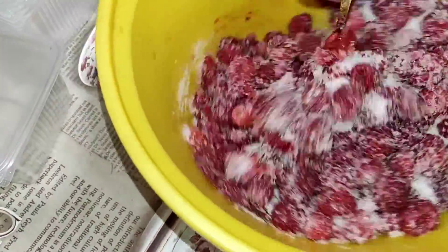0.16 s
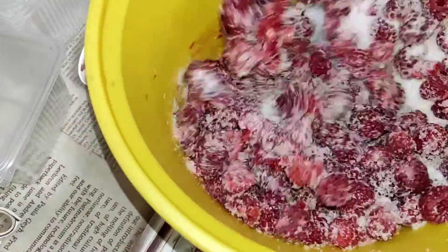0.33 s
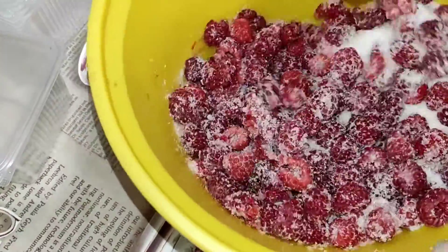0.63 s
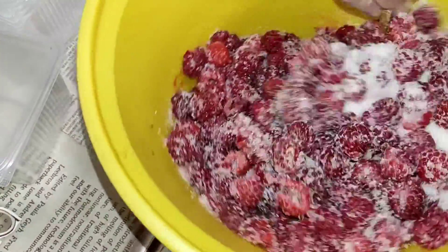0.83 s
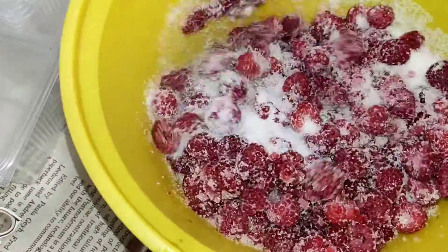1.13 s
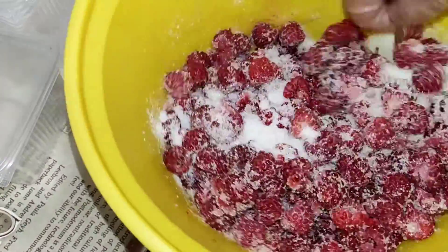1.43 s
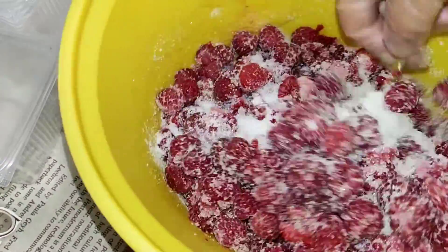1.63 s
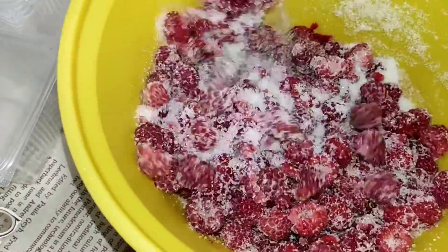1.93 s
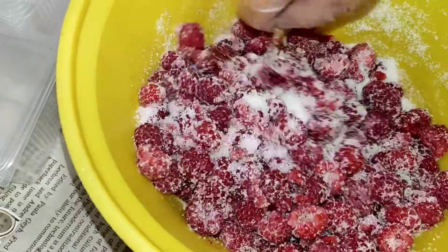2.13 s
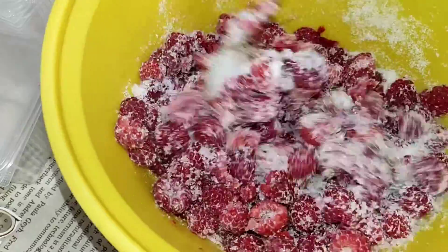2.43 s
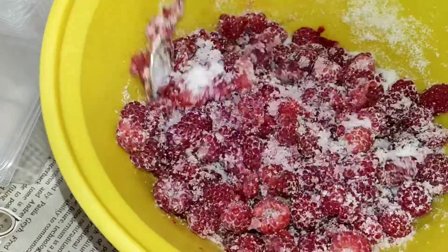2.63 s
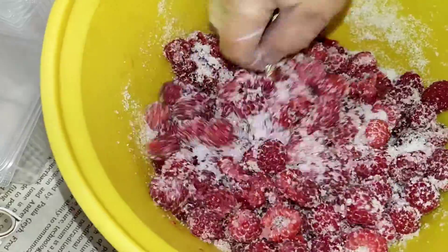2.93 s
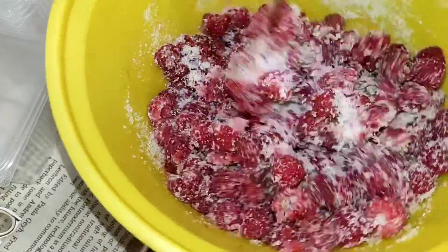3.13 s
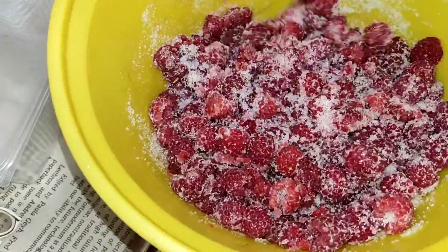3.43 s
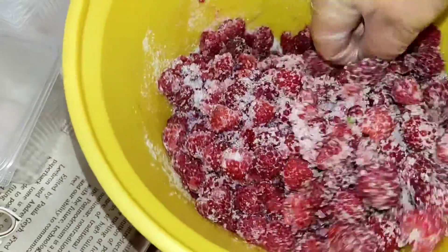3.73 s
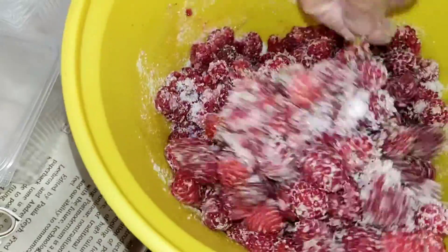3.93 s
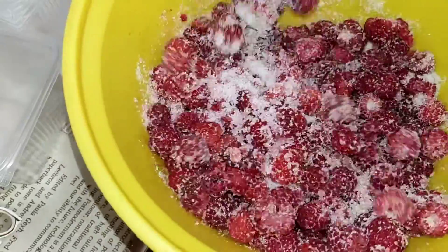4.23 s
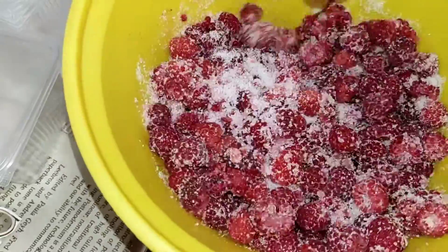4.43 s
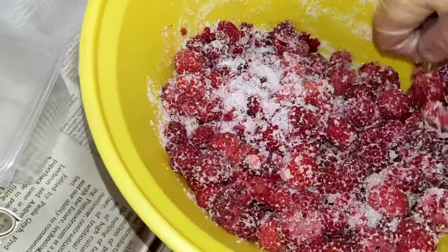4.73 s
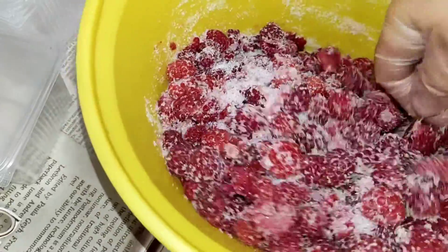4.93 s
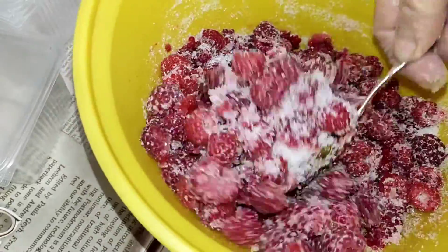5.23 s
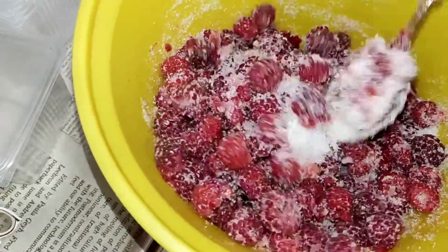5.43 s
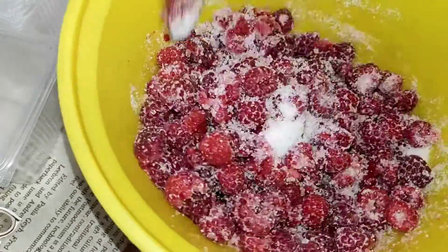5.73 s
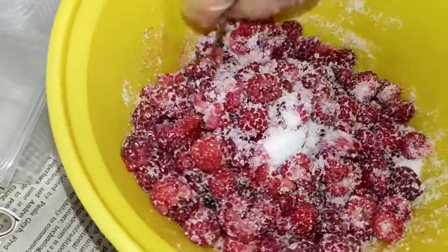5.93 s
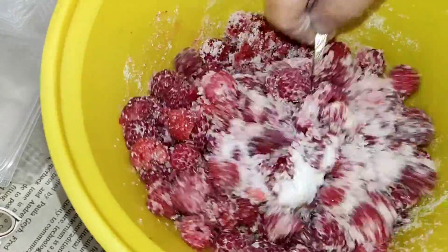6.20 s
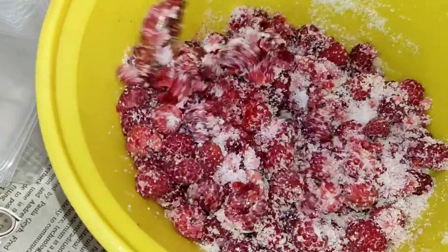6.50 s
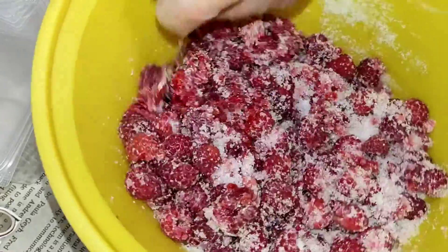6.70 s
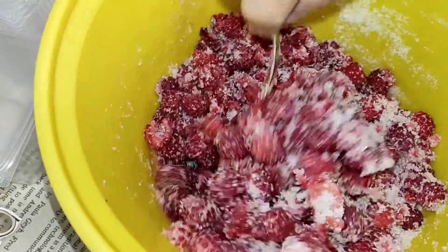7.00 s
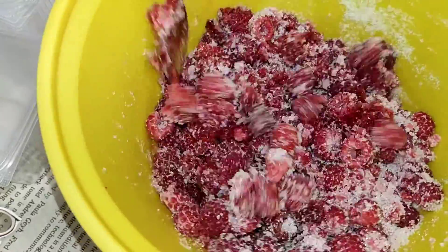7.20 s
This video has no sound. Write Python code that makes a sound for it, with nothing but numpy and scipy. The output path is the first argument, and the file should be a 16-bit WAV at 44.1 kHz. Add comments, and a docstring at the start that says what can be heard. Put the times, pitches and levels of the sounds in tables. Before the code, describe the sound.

Close stereo pickup of sugared raspberries being turned with a spoon. Each stroke gives a low, short plastic knock, a dry crackle of crushed sugar and sometimes a dull metal tick. Afterwards crystals trickle with a thin hiss and fruit tumbles damply on the wall. Strokes are irregular, with quiet gaps of rustling, slight room echo and low steady room tone.

```python
"""A spoon grates and bumps in a plastic bowl as sugar starts to trickle: raspberries are being folded in a kitchen.
Shaped noise grinds the spoon over sugar and cracks crystals; fading tones ring the bowl and the metal spoon.
Between strokes berries tumble back, built from tiny random hits, and sugar hisses and rustles after them.
Random noise with a dying tail gives the small room's echo, over a quiet, steady room tone."""
import sys
import numpy as np
from scipy import signal
from scipy.fft import rfft, irfft
from scipy.io import wavfile
from scipy.ndimage import uniform_filter1d, map_coordinates

SR = 44100
rng = np.random.default_rng(int(sys.argv[2]) if len(sys.argv) > 2 else 0)


def inscribe(sig):
    """Save sig as 16-bit PCM at rate SR to the path in sys.argv[1].

    A 1-D sig is mono; a 2-D sig holds one channel per row.
    Samples are clipped to [-1, 1] before scaling.
    """
    pcm = np.round(np.clip(np.atleast_2d(sig).T, -1, 1) * 32767)
    wavfile.write(sys.argv[1], SR, pcm.astype(np.int16))


N = 324425
TIME = np.arange(N) / SR
LEFT_RIGHT = np.array([[1], [-1]])

# Levels in the tables are relative: the functions that use them may add an overall level.
# Spoon dragged over sugar on the wall: start t/s, end t/s, start level/dB, end level/dB
SPOON_DRAGS = [(0.0, 0.05, -23.5, -53), (0.531, 0.549, -29, -22), (0.544, 0.597, -46, -54),
               (0.632, 0.713, -36.5, -24.5), (1.262, 1.301, -44, -38), (1.302, 1.366, -26.5, -26.5),
               (1.444, 1.49, -29, -30), (3.355, 3.386, -46, -42), (4.362, 4.374, -42, -24.5),
               (4.374, 4.423, -47, -41.5), (4.506, 4.535, -39, -30), (4.533, 4.573, -28, -36),
               (4.633, 4.697, -27.5, -21), (4.7, 4.744, -28, -39), (5.813, 5.837, -52, -34),
               (5.836, 5.842, -31, -27), (5.839, 5.862, -35, -30), (5.855, 5.876, -29.5, -14.5),
               (5.882, 5.932, -28, -30), (5.933, 5.973, -33, -24.5), (5.976, 6, -23, -25),
               (5.998, 6.012, -31, -29), (6.854, 6.894, -53, -24), (7.328, 7.367, -28, -37)]
# Where the dragged spoon sings: f/Hz, time to fall 60 dB t/s
SINGING_MODES = [(1770, 0.017), (2200, 0.039)]
# Parts of the heap sliding: start t/s, end t/s, fine sugar level/dB, fruit and coarse sugar level/dB
HEAP_SLIDES = [(0.0, -0.006, -33, -41.5), (0.198, 0.343, -43, -52.5), (0.432, 0.475, -46, -54),
               (0.64, 0.87, -39, -43), (1.003, 1.07, -43.5, -48.5), (1.304, 1.665, -34.5, -42),
               (1.666, 1.709, -36, -42), (1.86, 1.898, -46.5, -51.5), (1.986, 2.116, -42, -49.5),
               (2.205, 2.235, -46, -49.5), (2.484, 2.522, -43.5, -55), (2.744, 2.76, -37, -43.5),
               (2.89, 2.968, -45, -49), (3.155, 3.285, -48, -54.5), (3.43, 3.46, -43, -49.5),
               (3.55, 3.78, -44.5, -48), (3.817, 3.922, -39.5, -44), (4.047, 4.306, -47, -54.5),
               (4.413, 4.64, -45, -54.5), (4.622, 5.023, -36.5, -42), (5.026, 5.09, -38, -41.5),
               (5.186, 5.274, -44.5, -50.5), (5.324, 5.398, -46.5, -54), (5.544, 5.543, -59, -55.5),
               (5.673, 5.705, -46.5, -54.5), (5.91, 6.175, -45.5, -47.5), (6.24, 6.29, -49, -54),
               (6.397, 6.484, -46, -55.5), (6.55, 6.615, -49.5, -60), (6.717, 6.753, -37, -45.5),
               (6.853, 6.98, -42, -46), (7.09, 7.18, -50, -55), (7.192, 7.227, -50.5, -56)]
# Spoon and load bumping the bowl: t/s, deep ring level/dB, ring centre f/Hz,
# wall clack level/dB, clack centre f/Hz, clack width (share of its centre)
BOWL_KNOCKS = [(0.001, -11.5, 290, -8.5, 640, 0.45), (0.509, -36, 230, -46, 950, 0.33),
               (0.7168, -14.5, 248, -10, 750, 0.35), (0.752, -27, 229, -41, 800, .5),
               (0.805, -33.5, 240, -29, 790, .3), (1.257, -24.5, 158, -30, 1500, 0.18),
               (1.4879, -16, 330, -15, 700, 0.62), (1.599, -34, 326, -43, 480, 0.4),
               (2.2205, -23, 1700, -14.5, 1830, 0.22), (2.221, -22, 530, -15.5, 640, 0.41),
               (2.2265, -28.5, 360, -22, 620, .5), (2.258, -37, 400, -24, 800, .45),
               (3.572, -23, 236, -14, 1070, 0.16), (3.574, -19.5, 318, -23, 1650, 0.14),
               (3.6, -30, 256, -28, 940, 0.26), (3.615, -34, 256, -23, 900, 0.22),
               (3.632, -44, 300, -28, 960, 0.19), (3.638, -33, 500, -22.5, 920, 0.12),
               (3.689, -34.5, 650, -28.5, 675, .15), (3.733, -40, 243, -31, 800, .25),
               (4.227, -31.5, 164, -41, 730, 0.39), (4.372, -33, 201, -37, 794, 0.4),
               (4.545, -17.5, 345, -18.5, 1180, 0.15), (4.646, -52, 300, -20.5, 1350, 0.13),
               (4.686, -38, 300, -18.5, 865, 0.13), (4.786, -33.5, 318, -23.5, 585, 0.35),
               (4.906, -35.5, 300, -33, 803, 0.66), (4.989, -39, 267, -30, 700, 0.49),
               (5.529, -68, 297, -36.5, 1979, 0.55), (5.887, -37, 200, -21, 1540, 0.35),
               (5.94, -37, 300, -21.5, 1400, 0.27), (6.0135, -26, 251, -21.5, 460, 0.15),
               (6.161, -37.5, 560, -26, 557, 0.23), (6.176, -38, 553, -20.5, 1160, 0.25),
               (6.1827, -33, 550, -24, 1240, 0.21), (6.884, -30.5, 860, -20, 1420, 0.32),
               (7.329, -29.5, 260, -22.5, 1510, 0.38)]
# Ringing of the loaded plastic bowl: f/Hz, level/dB, time to fall 60 dB t/s
BOWL_MODES = [(122, 0, 0.21), (154, -6, 0.083), (202.5, -5, 0.39), (227.5, -1, 0.22), (300, 1, 0.086),
              (345, -3, 0.073), (416, -2.5, 0.14), (519, 1.5, 0.1), (612, -5, 0.1), (743, 1.5, 0.098),
              (960, 1.5, 0.11), (1090, 3.5, 0.082), (1735, 0, 0.072)]
# Berry clumps tumbling on the wall: start t/s, end t/s, level/dB, wall centre f/Hz, width (share of centre)
BERRY_TUMBLES = [(0.05, 0.113, -36.5, 890, 0.95), (0.723, 0.793, -45, 680, 0.43), (0.21, 0.3, -46, 536, 1),
                 (1.35, 1.46, -42.5, 594, 0.53), (1.5, 1.616, -42.5, 540, 0.52),
                 (2.211, 2.223, -35.5, 810, .3), (2.258, 2.25, -42, 930, .55),
                 (2.356, 2.393, -47.5, 766, 0.32), (2.91, 2.987, -49.5, 496, 1),
                 (3.593, 3.66, -35.5, 920, 0.37), (3.673, 3.698, -38.5, 714, 0.27),
                 (3.705, 3.754, -40, 834, 0.56), (4.545, 4.772, -42.5, 680, 0.62),
                 (5.048, 5.14, -40, 2000, 0.28), (5.883, 5.967, -36.5, 1410, 0.52),
                 (6.093, 6.173, -41, 840, 0.86), (6.163, 6.18, -33, 610, 0.24)]
# Larger crystals cracking: t/s, level/dB, left over right level/dB, extra low level/dB, extra top level/dB
CRYSTAL_CRACKS = [(0.5115, -11.5, -1.5, 0, -2), (0.5342, -27, -3, -5, 2), (0.5372, -12, -5, -1, -3),
                  (0.5424, -26, -10, 6, -4), (0.5964, -31, -5.0, 17, -4.0), (0.7016, -20.5, -8, 18, -5),
                  (0.706, -19, -11, 0.5, -8), (0.7171, -19, 11, 16, -2), (1.2564, -9.0, -4, 3, 0),
                  (1.311, -11, -8.5, 0.5, -4), (1.3875, -24, 0, 5, -6), (1.4126, -23, -4, 2, -3.0),
                  (1.4876, -11.5, -2, 4, 7), (2.0365, -29, -13, -16, -6), (2.2251, -23.5, 2, 6, 0),
                  (3.5731, -17, 2, 2, -1), (3.5998, -18.5, -3, 5, 0.5), (3.6316, -26.5, -5, 1, -1.0),
                  (4.3732, -15.5, -4, 2.5, -5), (4.3771, -12, -1, 2.5, -2), (4.53, -22.5, -1.0, 6, -2.0),
                  (4.5441, -13, 2, 6, 8), (4.6359, -18, 4, 13, 9), (4.6475, -19.5, -2, 13, 6),
                  (4.6705, -17, 3, -5, 8), (4.678, -19, -4.0, -2, -2.0), (4.6826, -16, 3, 7, 5),
                  (4.6868, -17, -4, -8, 3), (5.8385, -21.0, -4, -11, -1.0), (5.8535, -18, -3, -3, -2),
                  (5.8574, -11.5, -3.0, -10, -5), (5.862, -15.5, 0, -6, -9.0), (5.8726, -19, 0, -1, -2),
                  (5.8869, -13.5, 12, 3, 4), (5.8927, -20, -6, 0, -1), (5.9135, -23, 3, 1, 0),
                  (5.9205, -21.5, -2, -3, 2), (5.9285, -31, 6, 0, 4), (5.9395, -20, -2.0, -5, -6),
                  (5.953, -24, 5, 4, 3.0), (5.9699, -18, 13, 4.5, 6), (5.9768, -17, 7, -11, 10),
                  (6.0068, -26, 2, -5, 2), (6.1846, -29.5, -3, 9, -3), (6.8645, -27, -2, 4, -2),
                  (6.8815, -18, -5, 1, -4), (6.8848, -15, -1, 14.5, -5), (6.8924, -16.5, -1, 7, -12.0),
                  (7.3282, -10.5, -3, -9, -15), (7.3382, -18, -5, -9, -8)]
# Bare spoon meeting the wall: t/s, level/dB
SPOON_CLINKS = [(0.5115, -19), (1.257, -18.5), (4.376, -23), (5.887, -25), (6.886, -47), (7.329, -30)]
# Ringing of the spoon, damped by fruit and hand: f/Hz, level/dB, time to fall 60 dB t/s
SPOON_MODES = [(2200, 2.5, 0.024), (2550, -2, 0.014), (4600, -15, 0.01), (5270, -16, 0.02)]
# Thin ring of the spoon as it is lifted clear: t/s, f/Hz, level/dB, time to fall 60 dB t/s
LIFTED_SPOON = (6.886, 1770, -49, 0.45)
# Colour of the spoon's grinding: f/Hz, level/dB per Hz
GRIT_COLOUR = [(100, -19), (300, -12), (1000, -12.5), (2200, -7), (3300, -8.5), (5000, -6), (7000, -2.5),
               (8800, 1.5), (11000, 0), (13000, -10.5), (15000, -8)]
# Colour of fine sliding sugar: f/Hz, level/dB per Hz
HISS_COLOUR = [(2500, -32.5), (5000, -18), (7000, -10.5), (8000, -5.5), (8900, -1.5), (10000, -3),
               (11500, -8.5), (13000, -14), (14500, -20)]
# Colour of coarse sliding sugar: f/Hz, level/dB per Hz
RUSTLE_COLOUR = [(400, -19.5), (1000, -3), (1600, 0), (2150, 3.5), (3000, -1), (4500, -2.5), (6500, -6),
                 (10000, -9)]
# Colour of fruit rolling on fruit: f/Hz, level/dB per Hz
BERRY_COLOUR = [(90, -54), (160, -1), (220, 13.5), (270, -1), (520, 9), (900, 3.5), (1400, -11),
                (2500, -7.5), (6000, -28)]
# Colour of cracking crystals: f/Hz, level/dB per Hz
CRUSH_COLOUR = [(150, -28), (500, -13.5), (1000, -16), (2200, -13), (3400, -9.5), (5000, -6.5),
                (7000, -3.5), (8800, 5.5), (11000, 2.5), (13000, -5.5), (15000, -4)]
# Colour of the quiet room: f/Hz, level/dB per Hz
ROOM_COLOUR = [(20, 9.5), (50, -1), (80, -3.5), (130, -6.5), (220, -9), (400, -16), (1000, -27.5),
               (3000, -52), (14000, -14.5)]
# Likeness of left and right: f/Hz, likeness (no unit; limited when used)
STEREO_LIKENESS = [(30, 0.5), (70, -0.5), (130, 1.2), (300, 0.56), (650, 0.8), (1200, 0.03), (3000, -0.08),
                   (6000, 0), (7500, 0.85), (10000, 1.4), (14000, 0.8)]
# Balance of the two sides: f/Hz, left over right level/dB
STEREO_BALANCE = [(100, -1.5), (210, 1), (350, 3), (900, -0.5), (2500, 2), (4200, 0), (7000, -1.5),
                  (9500, -4.5), (11500, 9.5), (14000, 0.5)]

SLIDE_RISE_DB_PER_S, SLIDE_FALL_DB_PER_S = 140, 96.5   # gathers quickly, runs out more slowly
CREEP_SUGAR_DB, CREEP_FRUIT_DB = -52.5, -60   # the heap never quite rests
ROLL_DB, ROLL_FOLLOWS = -61, 0.52   # fruit's mean level; share of the slide's swing it follows
TICKS_PER_S = 110   # at the strongest slide
TUMBLE_RISE_DB_PER_S, TUMBLE_FALL_DB_PER_S = 900, 450
KITCHEN_T60_S, KITCHEN_DB, KITCHEN_TREBLE_DB = 0.36, -8.5, -3
ROOM_TONE_DB = -53
CUTOFF_HZ = 14200


def from_db(db):
    """Turn decibels into a multiplier."""
    return 10 ** (np.asarray(db) / 20)


def rms_one(x):
    """Scale to an average power of 1."""
    return x / np.sqrt(np.mean(x ** 2) + 1e-20)


def at_hz(points, hz):
    """Read a table between its points, with pitch spaced as the ear hears it (log frequency)."""
    known_hz, values = np.transpose(points)
    return np.interp(np.log(hz + 1), np.log(known_hz), values)


def causal(gain, size):
    """Make a filter with the given gain per frequency that acts as early as it can (minimum phase)."""
    cepstrum = irfft(np.log(gain + 1e-9))
    cepstrum[1:size // 2] *= 2
    cepstrum[size // 2 + 1:] = 0
    return irfft(np.exp(rfft(cepstrum)))


def radiate(pair, spectrum, likeness_share=1, size=4096):
    """Colour two unrelated noises and blend them into left and right, as alike as the tables ask."""
    hz = np.linspace(0, SR / 2, size // 2 + 1)
    gain = rms_one(from_db(at_hz(spectrum, hz)))
    alike = np.clip(likeness_share * at_hz(STEREO_LIKENESS, hz), -.98, .98)
    side_gain = gain * np.sqrt((1 - alike) / (1 + alike))
    mid = signal.oaconvolve(pair[0], causal(gain, size))[:N]
    side = signal.oaconvolve(pair[1], causal(side_gain, size))[:N]
    lean_db = at_hz(STEREO_BALANCE, hz) / 2
    channels = []
    for sign in (1, -1):
        balance = causal(from_db(sign * lean_db), size)
        channels.append(signal.oaconvolve(mid + sign * side, balance)[:N])
    return np.array(channels)


def drift(rate):
    """Wander smoothly between random values, drawn `rate` times a second with spread 1."""
    knots = rng.standard_normal(N // 8)
    return np.interp(TIME * rate, np.arange(len(knots)), knots)


def grains(per_s, spread_db):
    """Scatter tiny hits of uneven size at random times, as two channels of average power 1."""
    sizes = from_db(spread_db * np.minimum(rng.exponential(1, N), 4))
    hits = rng.random(N) < per_s / SR
    return rms_one(hits * sizes * rng.standard_normal((2, N)))


def patchy(pair, depth_db, width_hz, hold_s, size=512):
    """Let the colour wander: each band of pitch swells and sinks by itself."""
    hz, s, spectra = signal.stft(pair, SR, nperseg=size)
    knots = rng.standard_normal((140, 320))
    places = np.meshgrid(hz / width_hz, s / hold_s, indexing="ij")
    gain = from_db(depth_db * map_coordinates(knots, places, order=1, mode="wrap"))
    return signal.istft(spectra * rms_one(gain), SR, nperseg=size)[1][:, :N]


def clicks(times, sizes):
    """Put a one-sample click at each time."""
    return np.bincount(np.clip(np.round(times * SR).astype(int), 0, N - 1), sizes, N)


def ring(force, hz, t60):
    """Ring a fading sine with a force; a click of size 1 starts it at about height 1."""
    shrink, step = np.exp(-np.log(1000) / (t60 * SR)), 2 * np.pi * hz / SR
    feedback = [1, -2 * shrink * np.cos(step), shrink * shrink]
    return signal.lfilter([0, np.sin(step)], feedback, force + 1e-18)


def burst(noise, envelope):
    """Shape noise by an envelope; each channel gets exactly the envelope's energy."""
    shaped = noise[:, :len(envelope)] * envelope
    return shaped * np.sqrt(np.sum(envelope ** 2) / np.sum(shaped ** 2, axis=1, keepdims=True))


def swell(start, end, rise_db_per_s, fall_db_per_s):
    """Rise from start and fall towards end, both in dB below a ceiling of 0."""
    rise, fall = rise_db_per_s * (TIME - start), fall_db_per_s * (end - TIME)
    # Before start and after end the slopes carry on below the ceiling.
    return np.clip(np.minimum(rise, fall), -120, 0)


def band_around(hz, width):
    """Make a filter that passes pitches near a centre."""
    return signal.butter(2, [hz / (1 + width), hz * (1 + width)], "band", fs=SR, output="sos")


def without_bass(x, low_hz):
    """Weaken everything below low_hz."""
    return signal.sosfilt(signal.butter(2, low_hz, "high", fs=SR, output="sos"), x)


def room_tone():
    """Steady coloured noise stands for the quiet of the room."""
    return from_db(ROOM_TONE_DB) * radiate(rng.standard_normal((2, N)), ROOM_COLOUR)


def sing(force):
    """Grinding keeps two of the spoon's low tones ringing, at average power 1."""
    return rms_one(sum(ring(force, hz, t60) for hz, t60 in SINGING_MODES))


def scrapes(level_db, sing_db, likeness_share):
    """The spoon's edge sticks and slips through crystals: uneven hits grind, and the metal sings a little."""
    pressure = np.zeros(N)
    for start, end, start_db, end_db in SPOON_DRAGS:
        span = (TIME >= start) & (TIME < end)
        pressure[span] += from_db(np.interp(TIME[span], [start, end], [start_db, end_db]))
    force = uniform_filter1d(pressure, size=130) * rms_one(from_db(2.5 * drift(230)))
    grinding = force * patchy(grains(per_s=6000, spread_db=2.0), depth_db=5, width_hz=240, hold_s=.04)
    singing = from_db(sing_db) * grinding.std() * sing(grinding)
    return radiate(from_db(level_db) * grinding, GRIT_COLOUR, likeness_share) + singing


def sliding():
    """Each spoon push slides part of the heap; the strongest slide of the moment sets both levels in dB."""
    sugar_db, fruit_db = CREEP_SUGAR_DB, CREEP_FRUIT_DB
    for start, end, sugar_hold_db, fruit_hold_db in HEAP_SLIDES:
        shape = swell(start, end, SLIDE_RISE_DB_PER_S, SLIDE_FALL_DB_PER_S)
        sugar_db = np.maximum(sugar_db, sugar_hold_db + shape)
        fruit_db = np.maximum(fruit_db, fruit_hold_db + shape)
    return sugar_db, fruit_db


def sugar(fine_db, coarse_db, hiss_db, rustle_db, flutter_db):
    """Thousands of crystals slide off the berries in uneven spills: fine ones hiss, coarse ones rustle."""
    spills_db = flutter_db * drift(70)
    fine_grains = patchy(grains(per_s=24000, spread_db=1.5), depth_db=3, width_hz=250, hold_s=.03)
    coarse_grains = patchy(grains(per_s=9000, spread_db=1.9), depth_db=3.5, width_hz=170, hold_s=.025)
    hiss = radiate(from_db(fine_db + hiss_db + spills_db) * fine_grains, HISS_COLOUR)
    rustle = radiate(from_db(coarse_db + rustle_db + spills_db) * coarse_grains, RUSTLE_COLOUR)
    return hiss + rustle


def ticks(sugar_db, level_db, cycles):
    """Single crystals snap in the moving heap as short tones; a stronger slide snaps more of them."""
    snaps = rng.random(N) < TICKS_PER_S * from_db((sugar_db - sugar_db.max()) / 2) / SR
    snap_db = sugar_db + level_db + rng.uniform(-8, 0, N)
    sizes = snaps * from_db(snap_db) * rng.uniform(-1, 1, (2, N))
    pitches = np.geomspace(1800, 11000, num=16)
    dealt = rng.integers(0, len(pitches), N)   # which pitch each snap gets
    return sum(ring(sizes * (dealt == k), hz, cycles / hz) for k, hz in enumerate(pitches))


def berries(fruit_db):
    """Soft fruit patters on fruit: dull, random hits follow part of the slide's rise and fall."""
    level_db = ROLL_DB + ROLL_FOLLOWS * (fruit_db - fruit_db.mean())
    patter = patchy(grains(per_s=2000, spread_db=1.5), depth_db=4, width_hz=160, hold_s=.035)
    return radiate(from_db(level_db) * patter, BERRY_COLOUR)


def bowl_ring(level_db, octave_db, detune, low_hz):
    """Bumps ring the bowl: the spot favours nearby tones, the shifting load retunes them, and bass is weak."""
    hz, mode_db, t60 = np.transpose(BOWL_MODES)
    age, out = TIME[:SR // 3], np.zeros((2, 2 * N))
    sides = from_db(at_hz(STEREO_BALANCE, hz) * LEFT_RIGHT / 2)
    for s, deep_db, centre_hz, *_ in BOWL_KNOCKS:
        loaded_hz = hz * (1 + detune * rng.uniform(-1.27, 1, len(hz)))
        fading = np.exp(-np.log(1000) * age / t60[:, None])
        modes = np.sin(2 * np.pi * loaded_hz[:, None] * age) * fading
        octaves_away = np.abs(np.log2(hz / centre_hz))
        strengths = from_db(deep_db + level_db + mode_db + octave_db * octaves_away)
        first = max(round(s * SR), 0)
        out[:, first:first + len(age)] += (sides * strengths) @ modes
    return without_bass(out[:, :N], low_hz)


def wall_clacks(level_db, decay_s, push, side_db):
    """The wall's many crowded tones answer a bump with a firm push and a short hollow noise rattle."""
    wall, age = np.zeros((2, 2 * N)), TIME[:SR // 10]
    dying = np.exp(-age / decay_s)
    for start, _, _, clack_db, hz, width in BOWL_KNOCKS:
        force = rng.standard_normal((2, len(age))) * dying
        force[0, 0] += push
        rattle = signal.sosfilt(band_around(hz, width), force)
        clack = rms_one(rattle) * np.sqrt(np.mean(dying ** 2))
        first = max(round(start * SR), 0)
        wall[:, first:first + len(age)] += from_db(clack_db + level_db) * clack
    mid, side = wall[:, :N]
    return mid + from_db(side_db) * side * LEFT_RIGHT


def tumbles(level_db, side_db, wall_t60):
    """A falling clump drums on plastic, and the wall rings back with the hollow pitch of that spot."""
    thumps = grains(per_s=450, spread_db=1.0)
    wall_hz = np.geomspace(200, 2400, num=26) * rng.uniform(.96, 1.04, 26)
    patter = sum((-1) ** k * ring(thumps, hz, wall_t60) for k, hz in enumerate(wall_hz))
    out = np.zeros((2, N))
    for start, end, db, hz, width in BERRY_TUMBLES:
        # Leave room on both sides for the swell and its fading.
        span = slice(max(round(start * SR) - SR // 10, 0), round(end * SR) + SR // 5)
        shape = swell(start, end, TUMBLE_RISE_DB_PER_S, TUMBLE_FALL_DB_PER_S)[span]
        hollow = signal.sosfilt(band_around(hz, width), patter[:, span])
        out[:, span] += burst(hollow, from_db(db + level_db + shape))
    mid, side = out
    return mid + from_db(side_db) * side * LEFT_RIGHT


def cracks(level_db, rise_s, scatter_db, scatter_s):
    """A crystal shatters in a quick noise snap and splinters scatter; big ones crunch low, hard ones glint high."""
    age, out = TIME[:SR // 16], np.zeros((2, 2 * N))
    snap = (age / rise_s) ** 2 * np.exp(2 - 2 * age / rise_s)
    scatter = from_db(scatter_db) * np.exp(-age / scatter_s) * np.minimum(age / rise_s, 1)
    crush = patchy(grains(per_s=20000, spread_db=1.5), depth_db=3, width_hz=450, hold_s=.03)
    splinters = radiate(crush, CRUSH_COLOUR, likeness_share=.7)
    hz = np.linspace(0, SR / 2, len(age) // 2 + 1)
    low, top = np.interp(hz, [4000, 7500], [1, 0]), np.interp(hz, [9500, 12000], [0, 1])
    for k, (s, peak_db, pan_db, low_db, top_db) in enumerate(CRYSTAL_CRACKS):
        first = round(s * SR)
        own = slice(k * len(age), (k + 1) * len(age))   # each crack has its own stretch of noise
        noise = irfft(rfft(splinters[:, own]) * from_db(low_db * low + top_db * top), len(age))
        gain = from_db(peak_db + level_db + pan_db * LEFT_RIGHT / 2)
        out[:, first:first + len(age)] += gain * burst(noise, snap + scatter)
    return out[:, :N]


def spoon_ring(lag_s, low_hz):
    """The jolted spoon clinks in brief tones, reaching the right first; it is too small to radiate low notes."""
    s, level_db = np.transpose(SPOON_CLINKS)
    jolts = np.array([clicks(s + delay, from_db(level_db)) for delay in (lag_s, 0)])
    rings = sum((-1) ** k * from_db(mode_db) * ring(jolts, hz, t60)
                for k, (hz, mode_db, t60) in enumerate(SPOON_MODES))
    return without_bass(rings, low_hz)


def free_ring():
    """One faint tone of the lifted spoon outlasts its clink."""
    s, hz, db, t60 = LIFTED_SPOON
    return ring(clicks(np.array([s]), from_db([db])), hz, t60)


def kitchen(x, wall_hz, gap_s):
    """Many blended echoes, made of fading noise, follow after a short gap and are weaker in the treble."""
    age = TIME[:SR * 2 // 3]
    fading = from_db(-60 * age / KITCHEN_T60_S) * (age > gap_s)
    tail = rms_one(rng.standard_normal((2, len(age))) * fading) / np.sqrt(len(age))
    dull = signal.sosfilt(signal.butter(1, wall_hz, fs=SR, output="sos"), tail)
    echo = dull + from_db(KITCHEN_TREBLE_DB) * (tail - dull)
    return from_db(KITCHEN_DB) * signal.fftconvolve(x, echo, axes=1)[:, :N]


def scene():
    """Add spoon, bowl, fruit and sugar, their echo, and the quiet of the room."""
    spoon = scrapes(level_db=-1.5, sing_db=-22, likeness_share=0.46)
    spoon = spoon + cracks(level_db=-2.0, rise_s=0.0012, scatter_db=-10.5, scatter_s=0.014)
    spoon = spoon + spoon_ring(lag_s=0.000073, low_hz=1600) + free_ring()
    bowl = bowl_ring(level_db=-8.5, octave_db=-15, detune=0.039, low_hz=153)
    bowl = bowl + wall_clacks(level_db=-10.0, decay_s=0.0059, push=3.4, side_db=-5.5)
    sugar_db, fruit_db = sliding()
    fruit = berries(fruit_db) + tumbles(level_db=-6.5, side_db=-19.0, wall_t60=0.06)
    # The coarse sugar moves with the fruit.
    crystals = sugar(sugar_db, fruit_db, hiss_db=1.0, rustle_db=-0.2, flutter_db=1.0)
    crystals = crystals + ticks(sugar_db, level_db=11.5, cycles=11)
    near = spoon + bowl + fruit + crystals
    # The bowl's outer wall also faces the room.
    room = kitchen(near + from_db(-24) * bowl, wall_hz=2000, gap_s=0.0051)
    return near + room + room_tone()


def record(dry):
    """Clip anything beyond full scale, then cut the top steeply."""
    steep = signal.ellip(10, .2, 80, CUTOFF_HZ, fs=SR, output="sos")
    return signal.sosfilt(steep, np.clip(dry, -1, 1))


dry = scene()
out = record(dry)
inscribe(out)
```